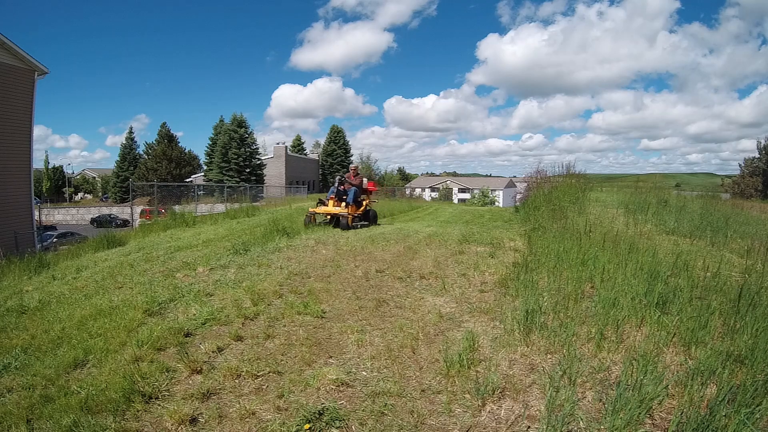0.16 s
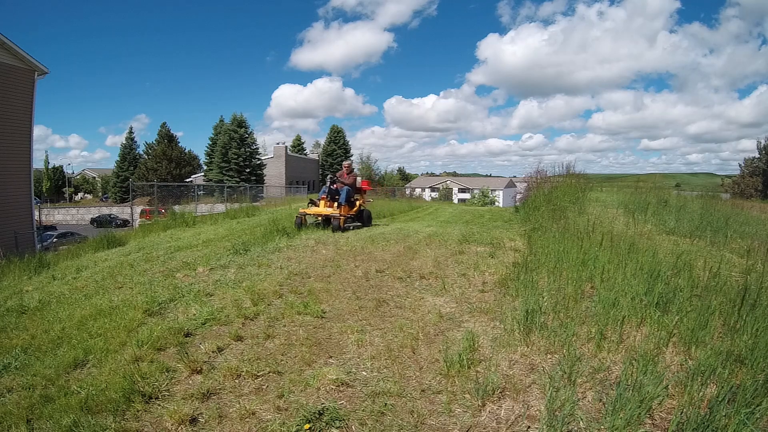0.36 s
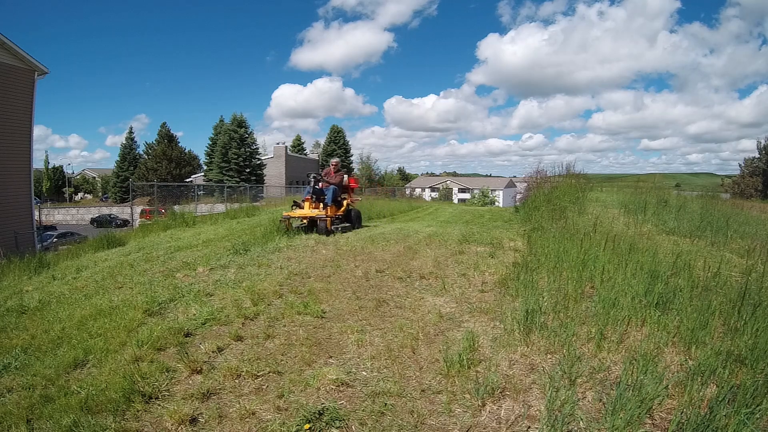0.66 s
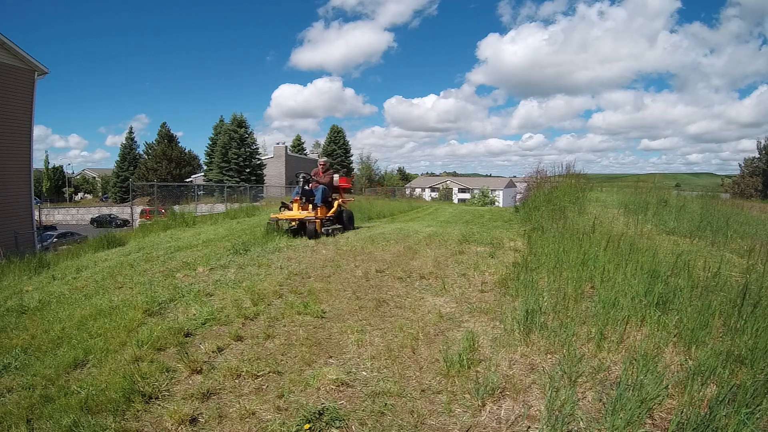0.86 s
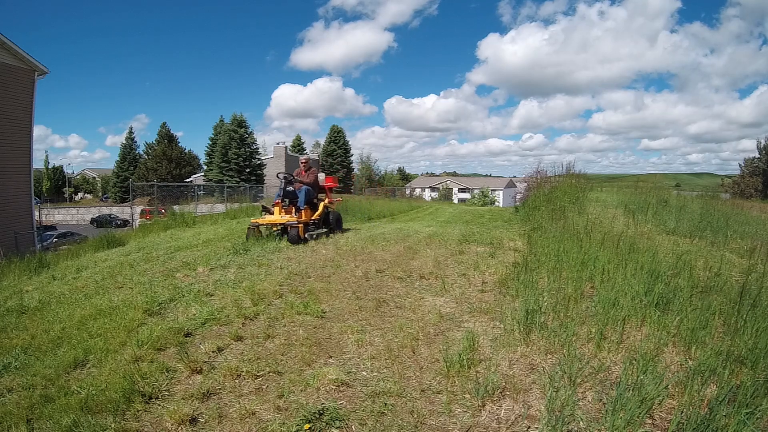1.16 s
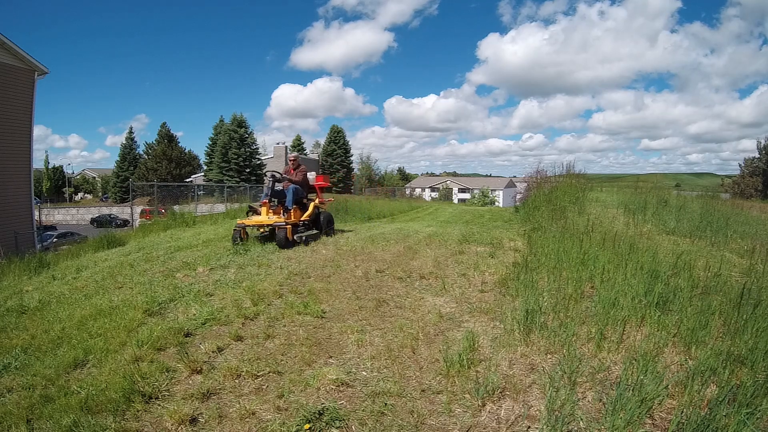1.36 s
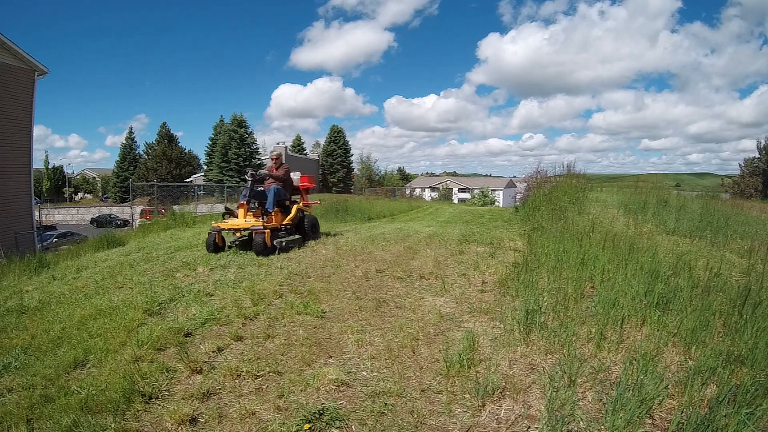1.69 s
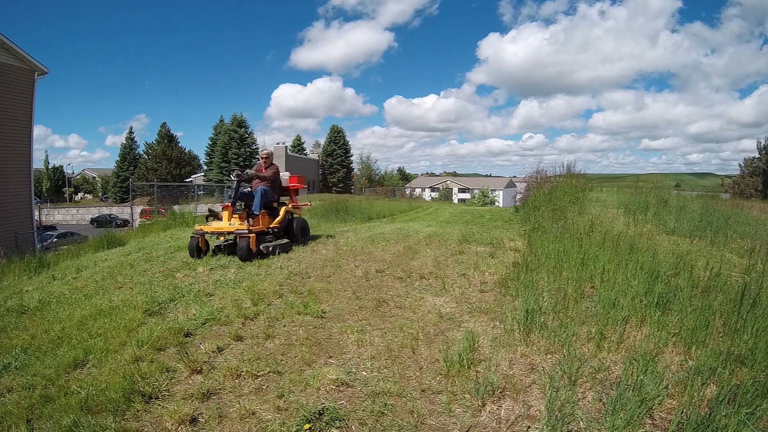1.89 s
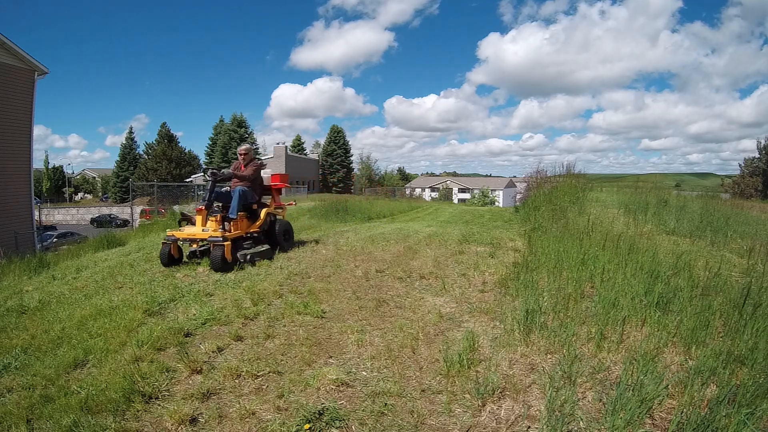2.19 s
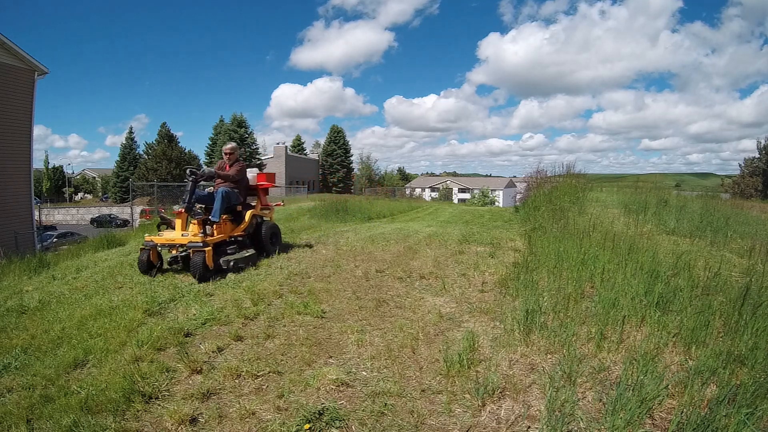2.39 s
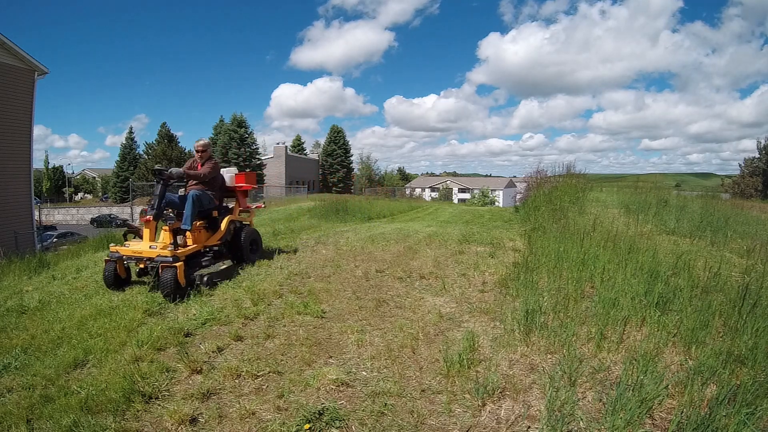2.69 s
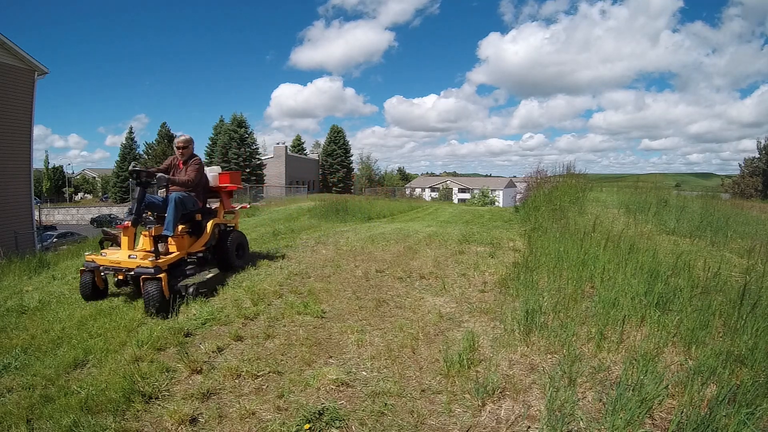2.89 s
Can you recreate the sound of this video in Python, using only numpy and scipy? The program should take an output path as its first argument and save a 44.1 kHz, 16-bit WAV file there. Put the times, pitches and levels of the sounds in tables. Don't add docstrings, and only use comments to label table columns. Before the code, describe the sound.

A ride-on mower engine drones and its blades thump steadily as it approaches across grass outdoors.

```python
import sys
import numpy as np
from scipy import signal
from scipy.fft import rfft, irfft
from scipy.io import wavfile
from scipy.ndimage import uniform_filter1d

SR = 44100
rng = np.random.default_rng(int(sys.argv[2]) if len(sys.argv) > 2 else 0)


def master_out(mix):
    frames = np.transpose(np.atleast_2d(mix))
    ceiling = np.clip(frames, -1, 1)
    pcm = np.round(ceiling * 32767).astype(np.int16)
    wavfile.write(sys.argv[1], SR, pcm)


def invert_db(x):
    u = np.asarray(x, float) / 20
    return 10 ** u


N = 134505
T = np.arange(N) / SR

# start_s, blade_pass_hz, level_db, nearness_brightening_db, thump_db
APPROACH = [(0.0, 85.3, -24, -3.5, -2), (0.05, 85.42, -27, -2, -1), (1.08, 88.18, -25, -1, -0.5),
            (1.27, 87.07, -20.5, -3, -2), (1.47, 86.62, -23.5, -0.5, -1.5), (1.83, 88.64, -24, 0, 0.5),
            (1.86, 86.24, -23.5, -0.5, -4.5), (1.89, 86.57, -25, 1.5, 1.5), (1.95, 87.9, -25.5, 2.5, -2.5),
            (2.12, 88.23, -24.5, 2.5, 1), (2.295, 88.33, -24.5, 2.5, 2.5), (2.325, 88.3, -23.5, 2, -4),
            (2.37, 88.53, -24, 2.5, 1), (2.6, 89.4, -24, 2.5, 1.8), (2.82, 90.2, -24.5, 2, 2.5),
            (3.02, 90.2, -25.5, 4.5, 4), (3.05, 90.5, -20.5, -0.5, -1.5)]
# multiple_of_blade_pass, level_db, extra_while_far_db (ground echo shifts the colour)
BLADE_HARMONICS = [(1, -19, -1.1), (2, -7, 2.4), (3, -7, 1.2), (4, -1.5, -1.5), (5, 1, -4.5), (6, -1, -1.1),
                   (7, -10, 7.5), (8, -9.5, 2.5), (9, -15, -3.5), (10, -12.5, -5.5), (11, -14, -0.5),
                   (12, -14.5, 5), (13, -16.5, -4.5), (14, -24, -0.8), (15, -28.5, -1.5)]
# start_s, cycle_hz, exhaust_db
ENGINE_RUN = [
    (0.0, 24.82, -41),
    (0.1, 24.72, -39),
    (1.0, 25.72, -40),
    (1.13, 25.63, -39.5),
    (1.21, 25.18, -42.5),
    (1.41, 25.23, -40.5),
    (2.12, 25.64, -35),
    (2.67, 26.15, -37.5),
    (3.05, 25.92, -36.5),
]
# multiple_of_cycle, level_db
EXHAUST_HARMONICS = [(2, -46), (3, -37.5), (5, -18.5), (6, -20), (8, -12.5), (9, -20), (10, -18), (11, -22),
                     (12, -22), (14, -15), (16, -24)]
# frequency_hz, density_db (per hz)
ROAR_COLOUR = [(50, -45), (110, -24), (200, -13.5), (400, 0), (650, 3), (1100, -0.5), (1600, -7),
               (3100, -23)]
# frequency_hz, density_db (per hz)
HISS_COLOUR = [(1470, -23), (2400, -1), (3000, -3.5), (3680, -9), (4390, -10), (4960, -14), (5940, -28),
               (6840, -24), (9580, -56), (12500, -84), (21100, -120)]
# low_hz, high_hz, level_db, share_of_time_at_start, share_at_end
PARTED_BANDS = [(3050, 4150, -3, .97, .97), (4150, 4650, -3, .1, .3), (4700, 5500, -3, .02, .25),
                (5600, 6300, -3, .05, .75)]
# start_s, body_db, body_hz, tip_db
STALK_SNAPS = [(0.8074, -58, 4456, -81), (1.1974, -49, 5000, -78.5), (1.2059, -54, 5500, -65),
               (1.2166, -47, 5500, -71.5), (1.227, -44, 5500, -63), (1.2298, -44, 5200, -62.5),
               (1.2417, -36, 4700, -65), (1.248, -36, 4300, -78), (1.253, -47, 4500, -64),
               (1.261, -33, 4350, -66), (1.275, -43, 4400, -75), (1.3345, -30.5, 3800, -61),
               (1.3347, -47, 6000, -75), (1.449, -52, 4400, -76), (1.507, -51.5, 4400, -75),
               (1.528, -41, 4494, -77), (1.5414, -39, 4200, -76), (1.599, -50, 4400, -74),
               (2.034, -51, 4509, -74), (2.052, -36, 4300, -77.5), (2.11, -38, 4400, -70),
               (2.2087, -46, 3797, -63.5), (2.3198, -40, 4838, -62.5), (2.34, -46, 4000, -57.5),
               (2.3995, -36, 4400, -66), (2.4215, -50, 4600, -72), (2.465, -48, 4600, -66),
               (2.632, -50, 4217, -59), (2.8342, -47, 4500, -67), (2.901, -24, 4170, -68),
               (2.9032, -29, 4340, -67), (3.0355, -52, 4400, -71)]
# start_s, peak_db, pitch_hz
DECK_KNOCKS = [
    (1.229, -19, 1700),
    (1.241, -21.5, 1900),
    (1.253, -29, 2200),
    (1.319, -26, 2700),
    (1.3663, -19, 2293),
    (1.3673, -23.5, 1900),
    (1.372, -22.5, 1500),
    (1.53, -35, 2600),
]


def level(x, db):
    return x * invert_db(db) / np.sqrt(np.mean(x ** 2))


def curve(table, column):
    points = np.array(table)
    return np.interp(T, points[:, 0], points[:, column])


def walk(rate_hz):
    hold = int(SR / rate_hz)
    steps = np.repeat(rng.standard_normal(N // hold + 1), hold)
    return 1.3 * uniform_filter1d(uniform_filter1d(steps, hold), hold)[:N]


def blades(turns):
    turns = turns + 0.007 * walk(60)
    far_until_s, far_fade_s = 1.2, 0.15
    far = 1 / (1 + np.exp((T - far_until_s) / far_fade_s))
    bite = 1.3 * walk(90)
    lead_turns, spread_turns = 0.14, 0.0058
    tone = 0
    for k, db, far_db in BLADE_HARMONICS:
        sway_db = (0.6 + 0.3 * k) * walk(18)
        bite_db = bite * np.clip((k - 2) / 3, 0, 1)
        drift = (0.025 + 0.0013 * k * k) * walk(5)
        phase = k * turns + lead_turns - spread_turns * (k - 4) ** 2 + drift
        tone = tone + invert_db(db + far_db * far + bite_db + sway_db) * np.cos(2 * np.pi * phase)
    return level(tone, -3.5) * invert_db(curve(APPROACH, 4))


def engine():
    cycle = np.cumsum(curve(ENGINE_RUN, 1)) / SR
    hum = 0
    for k, db in EXHAUST_HARMONICS:
        phase = k * (cycle + 0.0077 * walk(8.3)) + rng.random()
        hum = hum + invert_db(db + 1.3 * walk(7.1)) * np.sin(2 * np.pi * phase)
    return invert_db(8.5 + curve(ENGINE_RUN, 2)) * hum


def shape(table, hz):
    f, db = np.array(table, float).T
    table_octaves = np.log2(f)
    octaves = np.log2(np.maximum(hz, 1))
    below = np.maximum(table_octaves[0] - octaves, 0)
    above = np.maximum(octaves - table_octaves[-1], 0)
    return np.interp(octaves, table_octaves, db) - 24 * (below + above)


def noise(table, flicker_db, rate_hz):
    hz = np.fft.rfftfreq(N, 1 / SR)
    spectrum = rfft(rng.standard_normal(N)) * invert_db(shape(table, hz))
    place = 3 * np.log2(np.maximum(hz, 1) / 40)
    first = int(3 * np.log2(table[0][0] / 40)) - 2
    out = 0
    for band in range(first, first + 21):
        overlap = np.maximum(1 - abs(place - band), 0)
        out = out + irfft(spectrum * overlap, N) * invert_db(flicker_db * walk(rate_hz))
    return out


def parted(x):
    out = 0
    for low_hz, high_hz, db, start, end in PARTED_BANDS:
        chance = np.argsort(np.argsort(walk(30))) / N
        is_open = chance < start + (end - start) * T / T[-1]
        gate = uniform_filter1d(1.0 * is_open, 400)
        band = signal.ellip(5, 0.5, 60, [low_hz, high_hz], "band", fs=SR, output="sos")
        out = out + invert_db(db) * gate * signal.sosfilt(band, x)
    return invert_db(-0.5) * out


def deck(turns):
    puff_db = np.cos(2 * np.pi * (turns - 0.1))
    tuft_s, tuft_width_s = 1.235, 0.033
    tuft_db = 2.2 * np.exp(-((T - tuft_s) / tuft_width_s) ** 2)
    roar = level(noise(ROAR_COLOUR, 0.99, 17), -4) * invert_db(puff_db)
    rise_db = 1.5 * (T - 2.5)
    grit = invert_db(puff_db + 1.4 * walk(140) + rise_db + tuft_db)
    hiss = level(noise(HISS_COLOUR, 1.0, 18), -24) * grit
    apart = level(noise(HISS_COLOUR, 1.0, 18), -24) * grit
    return roar, hiss, parted(apart)


def near(x):
    low = signal.sosfiltfilt(signal.butter(2, 334, fs=SR, output="sos"), x)
    return low + (x - low) * invert_db(curve(APPROACH, 3))


def microphone():
    capsule = signal.ellip(8, 0.5, 60, 9730, fs=SR, output="sos")
    return level(signal.sosfilt(capsule, rng.standard_normal(N)), -88)


def wavelets(times, dbs, hzs, width_s):
    out = np.zeros(N + 512)
    u = (np.arange(512) - 128) / SR
    envelope = np.exp(-(u / np.where(u < 0, width_s, 1.5 * width_s)) ** 2 / 2)
    for s, db, hz in zip(times, dbs, hzs):
        at = int(s * SR) - 140
        out[at:at + len(u)] += invert_db(db) * envelope * np.sin(2 * np.pi * (hz * u + rng.random()))
    return out[:N]


def snaps():
    s, body_db, body_hz, tip_db = np.array(STALK_SNAPS).T
    body = wavelets(s, body_db, body_hz, 0.00016)
    tip = wavelets(s, tip_db + 8, np.full(len(s), 7300), 0.00008)
    return body + tip


def knocks():
    s, peak_db, pitch_hz = np.array(DECK_KNOCKS).T
    return wavelets(s, peak_db, pitch_hz, 0.00023)


def scene():
    turns = np.cumsum(curve(APPROACH, 1)) / SR
    gain = invert_db(curve(APPROACH, 2))
    roar, hiss, apart = deck(turns)
    mower = gain * (near(blades(turns) + roar) + hiss) + engine()
    mid = mower + snaps() + knocks() + microphone()
    side = gain * apart + invert_db(-12) * snaps() + invert_db(-13) * microphone()
    edges = np.minimum(np.minimum(T + 0.0002, T[-1] - T + 0.0004) / 0.004, 1)
    return edges * (mid + side * np.array([[1], [-1]]))


def top_cut(x):
    return signal.sosfilt(signal.butter(12, 12500, fs=SR, output="sos"), x)


def record(dry):
    mix = signal.sosfilt(signal.butter(4, 10400, fs=SR, output="sos"), dry)
    return top_cut(mix)


dry = scene()
out = record(dry)
master_out(out)
```